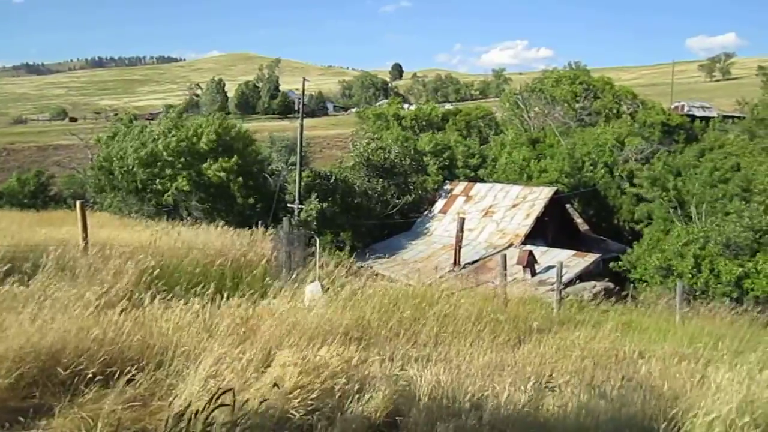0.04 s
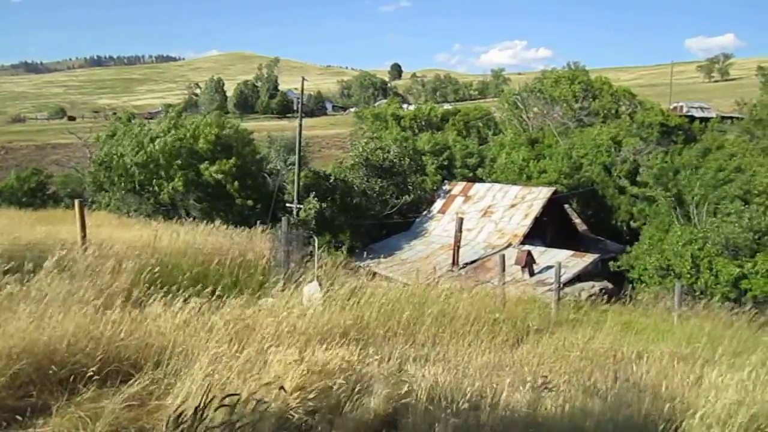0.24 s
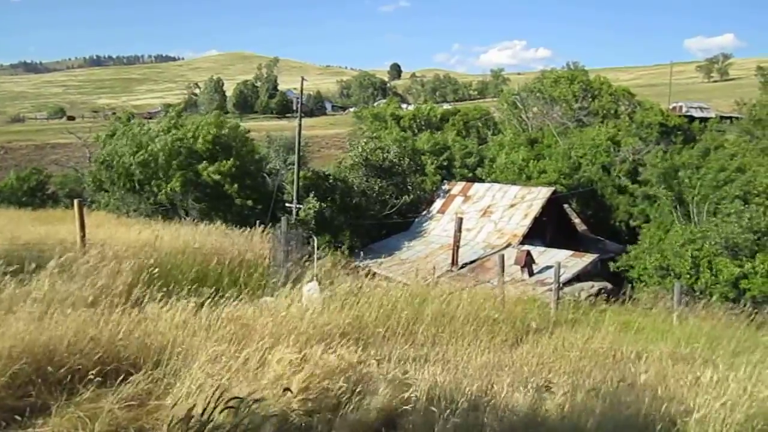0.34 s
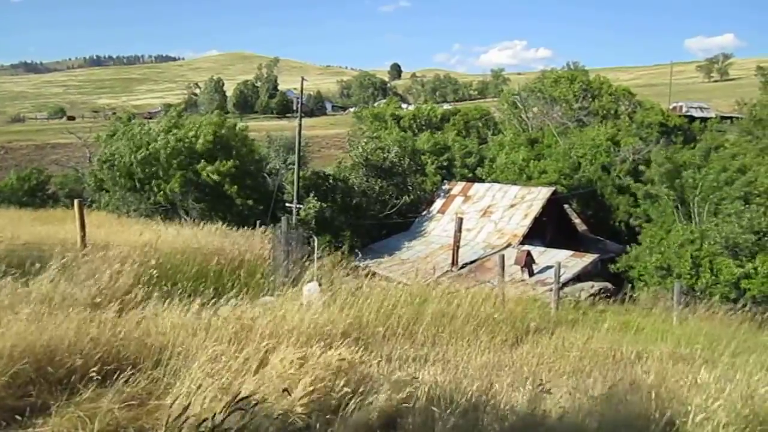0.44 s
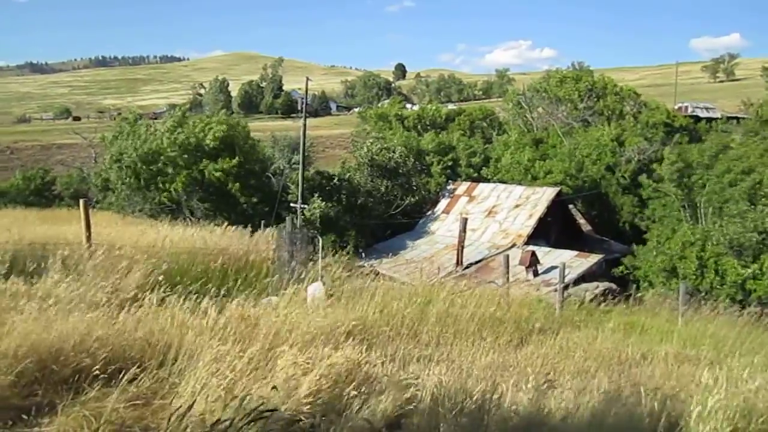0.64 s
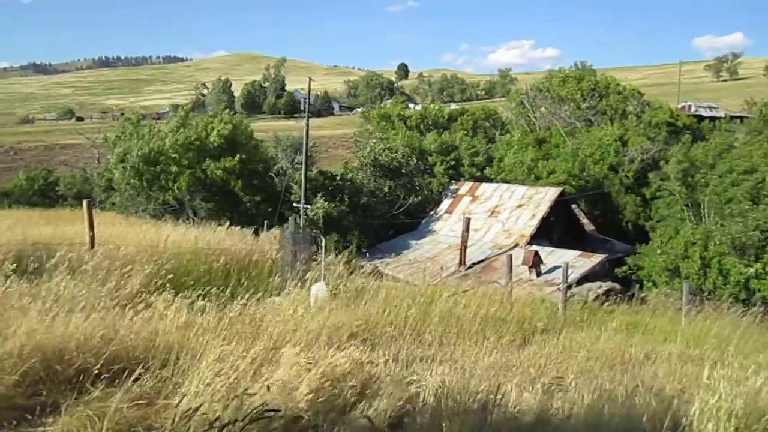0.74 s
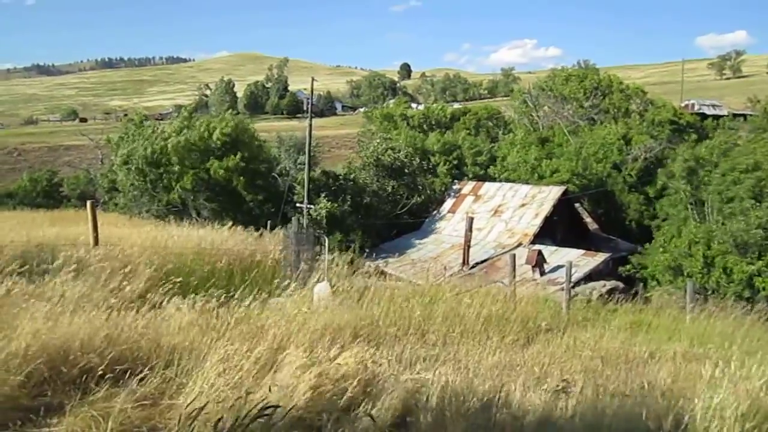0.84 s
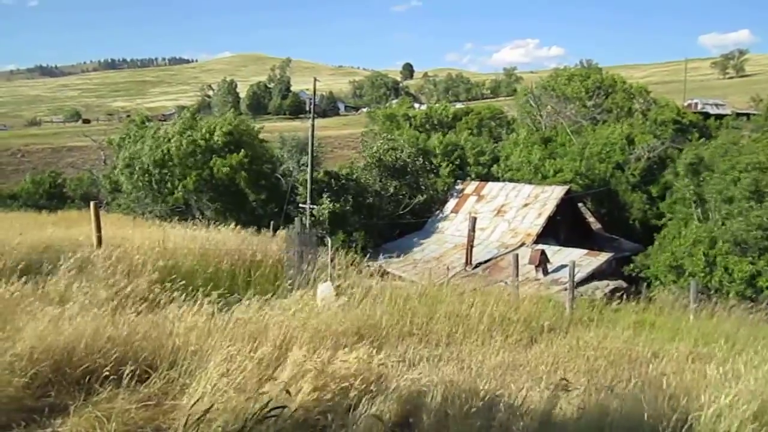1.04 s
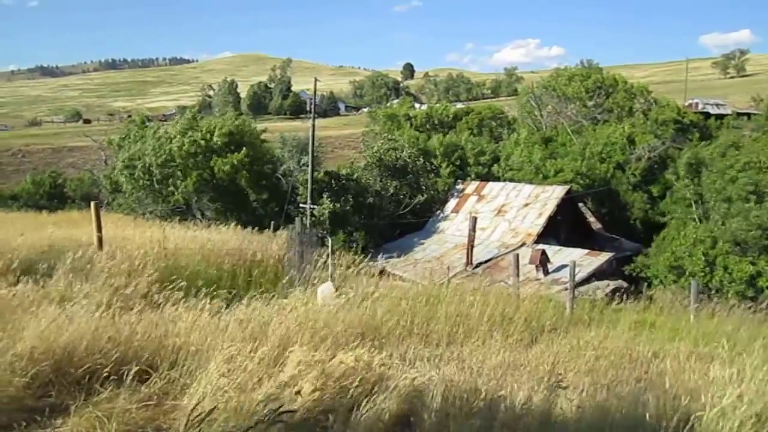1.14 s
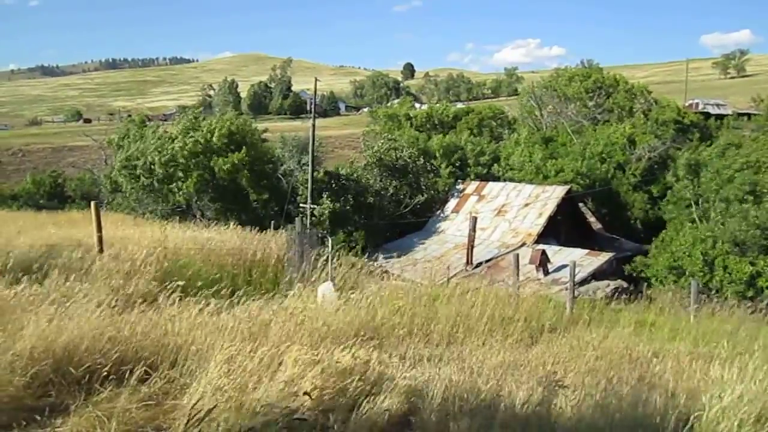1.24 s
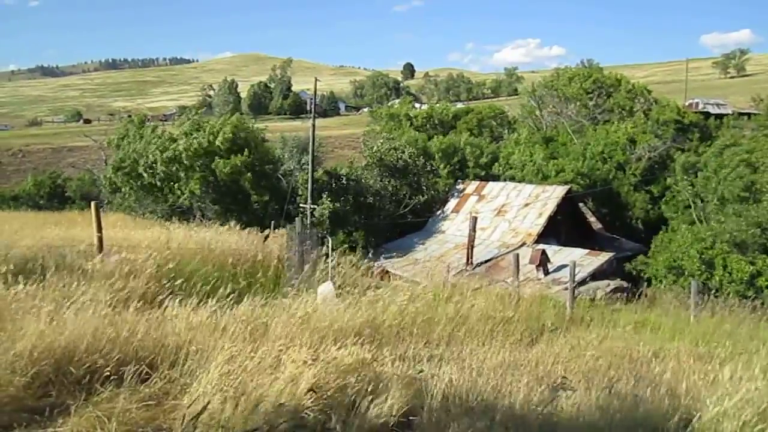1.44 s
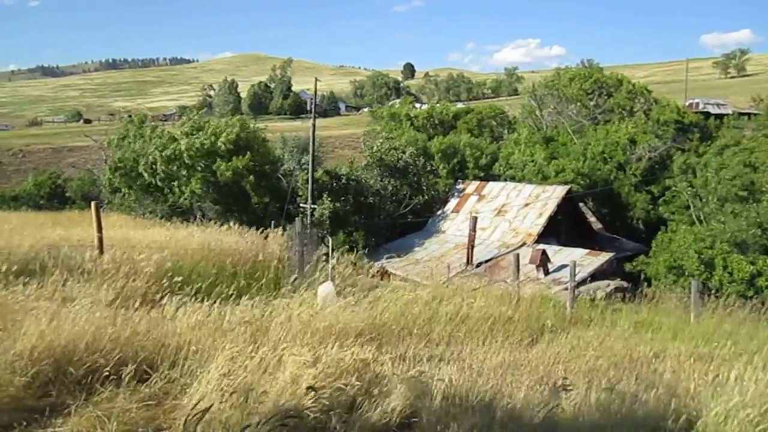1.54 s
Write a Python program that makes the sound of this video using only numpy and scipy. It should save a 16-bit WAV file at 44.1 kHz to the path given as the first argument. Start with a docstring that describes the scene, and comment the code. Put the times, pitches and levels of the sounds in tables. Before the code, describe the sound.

Wind buffets the microphone in one hard gust over softly hissing dry grass.

```python
"""A field of dry grass, the microphone out in the breeze. Stalks and distant trees hiss softly,
and two grasshoppers rasp, very high and faint. Right at the microphone, turbulent air makes soft
rumbles, two dull thumps, then one hard fluttering gust. The recorder's gain control ducks under
that gust and slowly lets the field back in."""
import sys
import numpy as np
from scipy import signal
from scipy.fft import rfft, irfft
from scipy.io import wavfile

SR = 44100
rng = np.random.default_rng(int(sys.argv[2]) if len(sys.argv) > 2 else 0)


def materialize(psi):
    """Save the field psi as 16-bit PCM at rate SR to the path in sys.argv[1].

    A 1-D psi becomes a single channel; in a 2-D psi each row is a channel.
    """
    bounded = np.clip(np.atleast_2d(psi).T, -1, 1)
    quanta = np.round(bounded * 32767).astype(np.int16)
    wavfile.write(sys.argv[1], SR, quanta)


N = 70560
T = np.arange(N) / SR


def from_db(db):
    """Decibels to gain."""
    return 10 ** (np.asarray(db) / 20)


def unit_rms(x):
    """Scale to an rms of 1."""
    return x / np.sqrt(np.mean(x ** 2) + 1e-20)


def fader(rows):
    """Gain over time, through points of seconds and dB."""
    return from_db(np.interp(T, *np.transpose(rows)))


def filtered(x, hz, kind, order):
    """Butterworth filter."""
    return signal.sosfilt(signal.butter(order, np.clip(hz, 5, .45 * SR), kind, fs=SR, output="sos"), x)


def shaped_noise(spectrum):
    """Noise of rms 1, its spectrum drawn through points of Hz and dB."""
    hz, db = np.transpose(spectrum)
    bin_hz = np.maximum(np.arange(N // 2 + 1) * SR / N, 1)
    gain = from_db(np.interp(np.log(bin_hz), np.log(hz), db))
    return unit_rms(irfft(rfft(rng.standard_normal(N)) * gain, N))


def drift(hz):
    """A smooth random wander of rms 1, moving at rates up to about hz."""
    return unit_rms(filtered(rng.standard_normal(2 * N), hz, "low", order=2)[N:])


def wind_buffets():
    """Turbulence on the microphone swells fast and dies more slowly; faster air sounds brighter."""
    # Bursts of turbulence. Each row: crest time in seconds, half-length in seconds,
    # level at the crest in dB, corner frequency in Hz.
    bursts = [(0.038, 0.014, -27, 164), (.051, 0.0033, -39, 810), (0.116, 0.0095, -39, 128),
              (0.177, 0.018, -31, 176), (0.219, 0.013, -24.5, 207), (0.291, 0.021, -36, 234),
              (0.353, 0.019, -34, 99), (0.394, 0.017, -22.5, 126), (0.387, 0.0014, -28.5, 740),
              (0.402, 0.014, -25, 368), (.446, 0.006, -27, 121), (0.502, 0.0027, -21, 312),
              (0.519, 0.0049, -29, 127.6), (0.566, 0.017, -19.5, 287), (0.588, 0.0045, -22, 615),
              (0.61, 0.0059, -23.5, 253), (0.631, 0.0022, -14, 510), (0.6453, 0.0042, -8, 630),
              (0.659, 0.0013, -11.5, 810), (0.6673, 0.0026, -6.5, 885), (0.676, 0.0013, -6.5, 826),
              (0.698, 0.0068, -4.5, 817), (0.718, 0.0038, -7, 237), (0.729, 0.0056, -10, 705),
              (0.753, 0.0041, -14, 590), (0.771, 0.0084, -18.5, 553), (0.797, 0.015, -19.5, 122),
              (0.814, 0.0081, -23, 448), (0.849, 0.0067, -29, 228), (0.905, 0.0059, -32, 295),
              (1.015, 0.018, -33, 273), (1.077, 0.007, -27, 258), (1.098, 0.01, -31, 108),
              (1.177, 0.01, -25.5, 217), (1.232, 0.027, -30, 208), (1.273, 0.0065, -25, 394),
              (1.308, .009, -23, 263), (1.329, 0.038, -31.5, 170), (1.385, 0.025, -39, 161),
              (1.488, 0.019, -39.5, 260), (1.539, 0.022, -40, 172), (1.582, 0.0071, -28, 328)]
    attack_share, release_share = 0.68, 1.184   # of the half-length
    out = np.zeros(N)
    for crest_s, half_s, db, corner_hz in bursts:
        air = rng.standard_normal(N + SR // 4)   # extra length lets the filters settle
        air = filtered(air, 0.5 * corner_hz, "low", order=2)   # gentle knee
        air = filtered(air, 1.406 * corner_hz, "low", order=5)   # steep top
        air = filtered(air, 60 + 0.092 * corner_hz, "high", order=2)[-N:]
        width_s = half_s * np.where(T < crest_s, attack_share, release_share)
        swell = np.exp(-.5 * ((T - crest_s) / width_s) ** 2)
        out += from_db(db) * unit_rms(air * swell) * np.sqrt(np.mean(swell ** 2))
    return out


def eddy_thumps():
    """An eddy hitting the microphone port is a brief suction between two weaker pushes."""
    # Single pressure pulses. Each row: time in seconds, peak level in dB, centre frequency in Hz.
    eddies = [(.050, -29.5, 187), (0.392, -24.5, 119), (.510, -8.5, 106.5), (0.5613, -5.5, 96.3),
              (0.6841, 1.5, 260)]
    out = np.zeros(N)
    for at_s, db, hz in eddies:
        phase_squared = (np.pi * hz * (T - at_s)) ** 2
        out += from_db(db) * (2 * phase_squared - 1) * np.exp(-phase_squared)
    return out


def gust_snap():
    """A tiny broadband snap under the hardest eddy, at the height of the gust."""
    at_s, level_db, decay_s = .6845, -31, .0005
    hiss = filtered(rng.standard_normal(N), hz=7000, kind="low", order=1)
    return from_db(level_db) * hiss * np.exp(-np.abs(T - at_s) / decay_s)


def air_stream():
    """Air flowing over the microphone keeps up a low rumble between the bursts."""
    # Strength of the stream. Each row: time in seconds, level in dB.
    stream_levels = [(0, -47), (.3, -42.5), (.55, -35), (.78, -24), (.88, -41.5), (.96, -51), (1.1, -47),
                     (1.3, -36.5), (1.45, -46), (1.6, -39)]
    # Tone of the rumble. Each row: frequency in Hz, relative spectral density in dB.
    rumble_spectrum = [(10, -73), (25, 12.5), (50, -4), (110, 4.5), (200, -17), (400, -9), (900, -84),
                       (3000, -84)]
    return fader(stream_levels) * shaped_noise(rumble_spectrum)


def grass_rustle():
    """Countless stalks and distant leaves merge into a soft, slightly fluttering hiss."""
    # Strength of the breeze in the field. Each row: time in seconds, level in dB.
    breeze_levels = [(0, -45.5), (.4, -44), (.65, -44), (1.0, -43.5), (1.3, -45.5), (1.6, -44.5)]
    # Tone of grass and leaves. Each row: frequency in Hz, relative spectral density in dB.
    rustle_spectrum = [(60, 11), (300, -3.5), (520, -2.5), (780, 1), (1250, -2.5), (2000, -7), (3000, -11),
                       (4200, -14), (5400, -16), (6600, -15), (8300, -17.5), (10000, -17.5), (12000, -23.5),
                       (14000, -22), (15700, -33)]
    flutter_db = 0.11 * drift(hz=25)
    return fader(breeze_levels) * from_db(flutter_db) * shaped_noise(rustle_spectrum)


def grasshoppers():
    """One rasps in slightly uneven strokes, one in a faster buzz; the teeth on their legs roughen both."""
    # Tone of the rasp. Each row: frequency in Hz, relative spectral density in dB.
    rasp_spectrum = [(6000, -40), (8500, -19), (10100, -11), (10600, -3.5), (11500, 0), (11900, -3.5),
                     (12400, -4), (12900, -12), (14200, -17.5), (15700, -20)]
    # Song of the pulsing insect. Each row: time in seconds, level in dB.
    pulsing_levels = [(0, -60), (.4, -60.5), (.7, -52.5), (.95, -53.5), (1.17, -55.5), (1.21, -62.5),
                      (1.31, -63), (1.35, -60), (1.415, -62.5), (1.44, -84)]
    # Song of the buzzing insect. Each row: time in seconds, level in dB.
    buzzing_levels = [(0, -62), (.25, -57), (.35, -57.5), (.43, -51.5), (.63, -54.5), (.67, -69),
                      (.72, -80)]
    stroke_period_s, stroke_crest_s, sharpness = .0243, .950, .62
    buzz_hz, buzz_depth = 85.6, 0.14
    jitter_s = 0.0011 * drift(hz=16)
    uneven_db = 0.5 * drift(hz=16)
    cycles = (T - stroke_crest_s + jitter_s) / stroke_period_s
    strokes = unit_rms(np.exp(sharpness * np.cos(2 * np.pi * cycles)) * from_db(uneven_db))
    buzz = unit_rms(1 + buzz_depth * np.cos(2 * np.pi * buzz_hz * T))
    pulsing = fader(pulsing_levels) * strokes * shaped_noise(rasp_spectrum)
    buzzing = fader(buzzing_levels) * buzz * shaped_noise(rasp_spectrum)
    tooth_roughness = unit_rms(from_db(-0.7 * drift(hz=500)))
    return (pulsing + buzzing) * tooth_roughness


def scene():
    """The field all around and the wind right on the microphone, in mono."""
    field = grass_rustle() + grasshoppers()
    wind = air_stream() + wind_buffets() + eddy_thumps() + gust_snap()
    return (field + wind)[None]


def gain_control(x):
    """The recorder turns down by the excess over a threshold, holds, then recovers at a steady rate."""
    threshold_db, window_s, hold_s, release_db_per_s = -16.5, 0.028, 0.064, 18
    pole = np.exp(-1 / (window_s * SR))
    power = signal.lfilter([1 - pole], [1, -pole], x ** 2)
    excess_db = np.maximum(10 * np.log10(power + 1e-12) - threshold_db, 0)
    release_db = release_db_per_s * T
    duck_db = np.maximum.accumulate(excess_db + release_db) - release_db
    held_db = np.interp(T - hold_s, T, duck_db)
    return x * from_db(-np.maximum(duck_db, held_db))


def record(dry):
    """The recorder: gain control, then a steep cut of the highest treble."""
    cutoff_hz = 15660
    top_cut = signal.ellip(12, .1, 90, cutoff_hz, fs=SR, output="sos")
    return signal.sosfilt(top_cut, gain_control(dry[0]))[None]


dry = scene()
out = record(dry)
materialize(out)
```